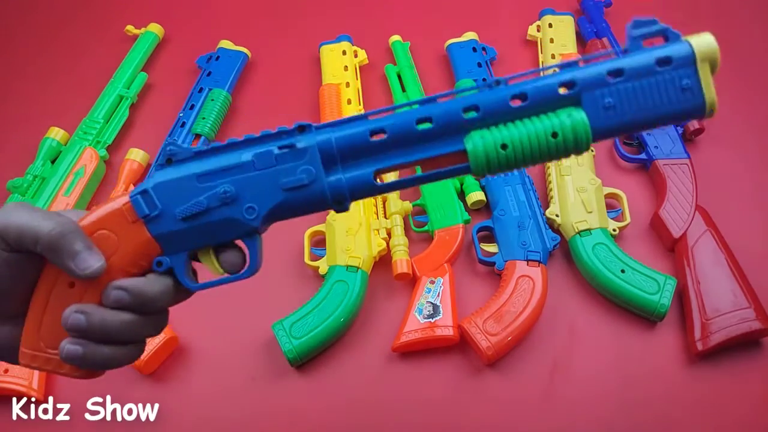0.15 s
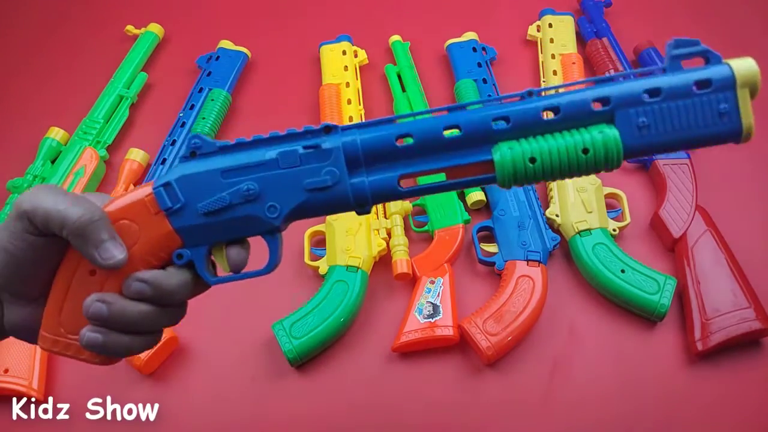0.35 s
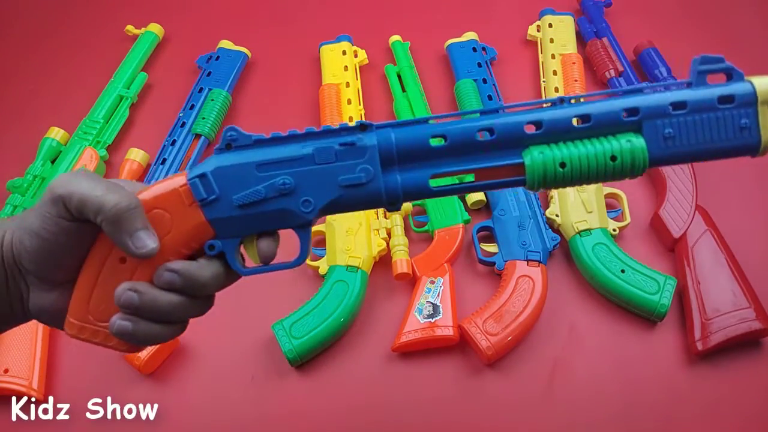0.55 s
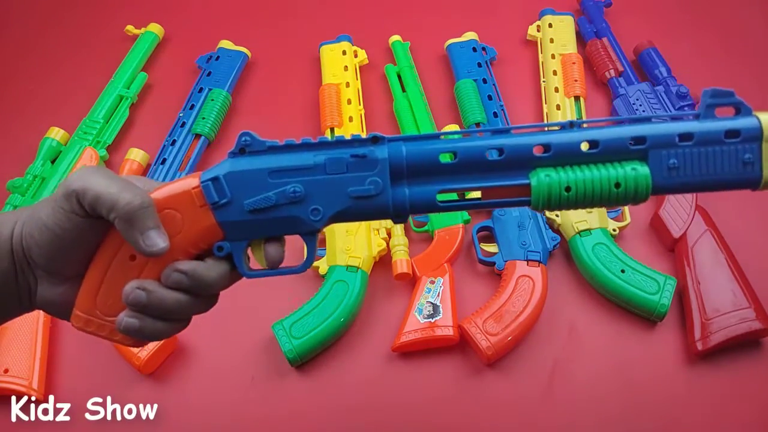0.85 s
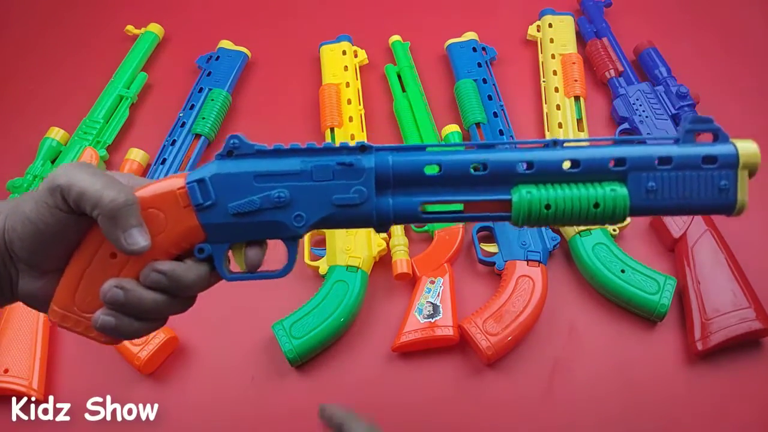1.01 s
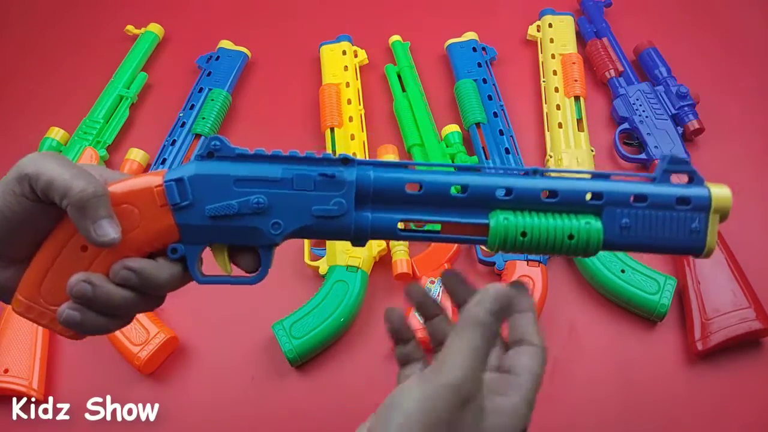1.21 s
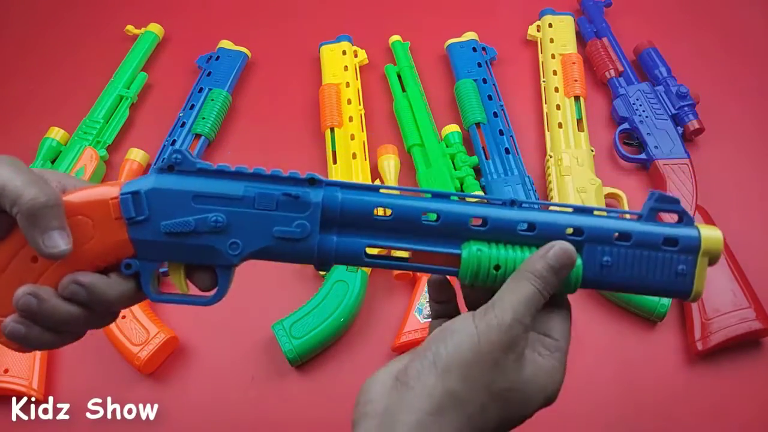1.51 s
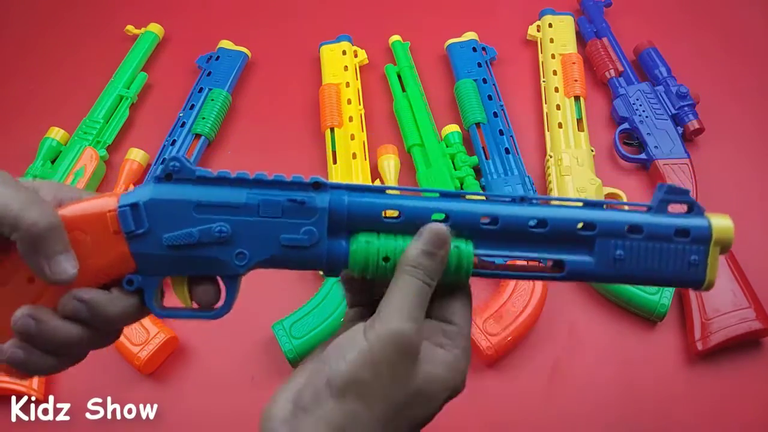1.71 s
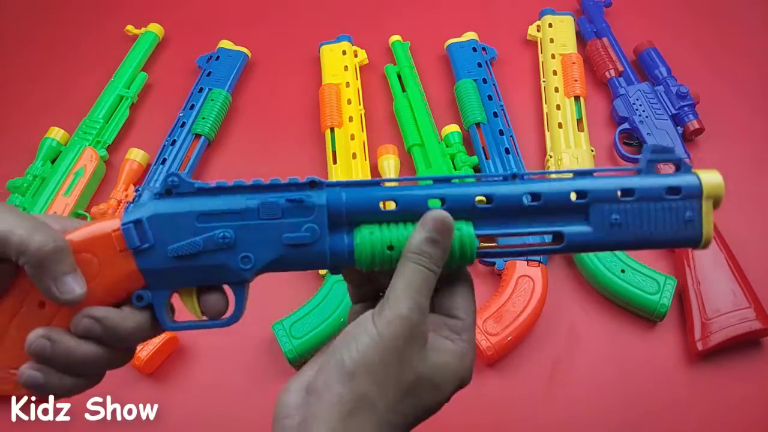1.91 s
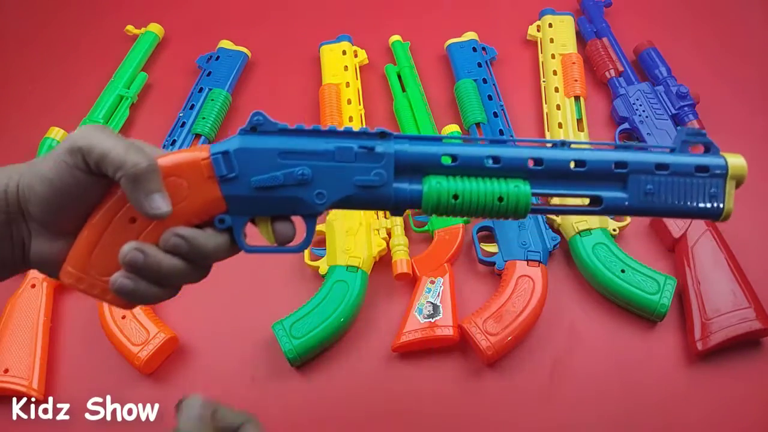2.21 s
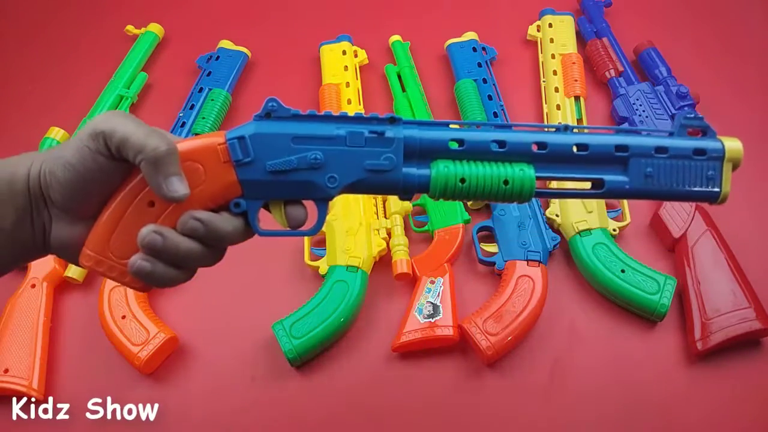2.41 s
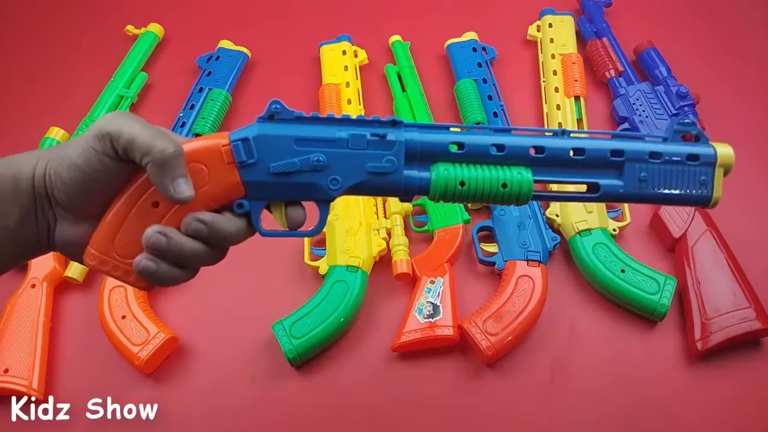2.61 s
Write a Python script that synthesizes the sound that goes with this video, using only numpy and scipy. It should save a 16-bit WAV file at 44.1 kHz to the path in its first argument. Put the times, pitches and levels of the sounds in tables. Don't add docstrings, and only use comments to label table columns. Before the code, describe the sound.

Light alternating plastic ticks from inside a toy gun, then a quick gritty slide with a sharp latch clack and stop knock, a short pause and a springy trigger snap; close stereo microphone, short room echo, quiet hum and hiss.

```python
import sys
import numpy as np
from scipy import signal
from scipy.fft import rfft, irfft
from scipy.io import wavfile
from scipy.ndimage import uniform_filter1d, map_coordinates

SR = 44100
rng = np.random.default_rng(int(sys.argv[2]) if len(sys.argv) > 2 else 0)


def elevation(decibels):
    levels = np.asarray(decibels, float)
    return 10 ** (levels / 20)


def log_audio(samples):
    frames = np.atleast_2d(samples).T
    limited = np.clip(frames, -1, 1)
    pcm = np.round(limited * 32767).astype(np.int16)
    wavfile.write(sys.argv[1], SR, pcm)


N = 121275


def shaped(points, rows):
    hz, db = np.array(points, float).T
    f = np.maximum(np.arange(N // 2 + 1) * SR / N, 1)
    gain = elevation(np.interp(np.log(f), np.log(hz), db, left=-90, right=-90))
    x = irfft(rfft(rng.standard_normal((rows, N))) * gain, N)
    return x / np.sqrt(np.mean(x ** 2))


def wide(pair, side_db):
    return pair[0] + elevation(side_db) * pair[1] * np.array([[1], [-1]])


def panned(db):
    return elevation(np.array([[db], [-db]]) / 2)


def walk(rate_hz):
    k = int(SR / rate_hz)
    steps = np.repeat(rng.standard_normal(N // k + 1), k)
    return 1.275 * uniform_filter1d(uniform_filter1d(steps, k), k)[:N]


def level_over_time(points):
    s, db = np.array(points).T
    return np.interp(np.arange(N) / SR, s, db, left=-120, right=-120)


def ring(x, hz, width):
    return signal.lfilter(*signal.iirpeak(hz, hz / width, fs=SR), x)


def treble(x, db):
    return x + (elevation(db) - 1) * signal.lfilter(*signal.butter(1, 8200, "high", fs=SR), x)


def fan():
    # f/Hz, level/dB rms, pitch wander/Hz
    motor_tones = [(201.7, -64, 4.23), (387.7, -72, 5.83), (301.8, -73.5, 8.9), (351, -91, 9.07)]
    # f/Hz, level/dB per Hz
    whirr_colour = [(24, -76), (40, -46.5), (167, -18), (196, -0.5), (274, -7.5), (384, -5.5), (568, -23),
                    (624, -21), (1000, -34), (1300, -79), (2200, -120)]
    turn_hz, throb_db, loudest_s = 4.377, 3, 2.25
    t = np.arange(N) / SR
    hum = 0
    for hz, db, wander in motor_tones:
        level = elevation(db + 3.28 * walk(6.96)) * np.sqrt(2)
        cycles = hz * t + np.cumsum(wander * walk(12)) / SR
        hum = hum + level * np.sin(2 * np.pi * cycles)
    throb = throb_db * np.cos(2 * np.pi * turn_hz * (t - loudest_s))
    whirr = wide(shaped(whirr_colour, 2), side_db=-12) * elevation(-62 + 0.97 * walk(4.0) + throb)
    return hum * panned(1) + whirr


def microphone_hiss():
    # f/Hz, level/dB per Hz
    hiss_colour = [(500, -4.5), (1000, -10), (2000, -12.5), (5000, -15.5), (10000, -13.5), (13300, -13),
                   (14800, -16), (15500, -35)]
    return wide(shaped(hiss_colour, 2), side_db=0) * elevation(-71.5 + 0.52 * walk(0.58))


def room(x):
    # f/Hz, time to fall 60 dB/s, level/dB
    room_bands = [(840, 0.38, 4.5), (1890, 0.44, 3), (5000, 0.25, 1), (11000, 0.31, 4.5)]
    # f/Hz, time to fall 60 dB/s, level/dB
    table_rings = [(709.2, 1.2, -18.5), (849, 1.05, -16.5), (885, 0.33, -20), (1190, .5, -22)]
    side_db, first_echo_s = 0.5, 0.00043
    table_hz, table_width_hz, table_t60_s, table_db = 795, 150, 0.69, -0.5
    t = np.arange(int(0.6 * SR)) / SR
    tail = 0
    for hz, t60, db in room_bands:
        band_filter = signal.butter(2, [hz / 1.95, hz * 2.0], "band", fs=SR)
        band = signal.lfilter(*band_filter, rng.standard_normal((2, len(t))))
        tail = tail + wide(band, side_db) * elevation(db - 60 * t / t60) * np.sqrt(14 / (t60 * SR))
    table = ring(rng.standard_normal((2, len(t))), table_hz, table_width_hz)
    table = table * elevation(table_db - 60 * t / table_t60_s)
    tail = tail + wide(table, side_db) * np.sqrt(14 / (table_t60_s * SR))
    for hz, t60, db in table_rings:
        tail = tail + elevation(db - 60 * t / t60) * np.sin(2 * np.pi * hz * t) * np.sqrt(14 / SR)
    tail = tail * np.clip(t / first_echo_s, 0, 1)
    return signal.fftconvolve(x[None], tail, axes=1)[:, :N]


def hand():
    # t/s, level/dB
    brush_level = [(1.24, -89), (1.36, -75), (1.55, -84), (1.72, -80), (1.8, -95)]
    # f/Hz, level/dB per Hz
    brush_colour = [(6000, -18), (10000, -5), (13500, 2), (15800, -4)]
    return wide(shaped(brush_colour, 2), side_db=0) * elevation(level_over_time(brush_level) + 1.5 * walk(25))


def slide():
    # t/s, level/dB
    rub_level = [(1.68, -77), (1.714, -55.5), (1.756, -41), (1.782, -28), (1.798, -41), (1.841, -40),
                 (1.97, -70.5), (1.975, -67)]
    # f/Hz, level/dB per Hz
    rub_colour = [(500, -18.5), (1130, 0), (1630, -7.5), (2600, 1.5), (4500, -6.5), (10000, -2),
                  (12200, -7.5), (15600, -13)]
    loudest_db = -44.5
    level = level_over_time([(s, min(db, loudest_db)) for s, db in rub_level])
    unevenness = 2.7 * walk(400) + 0.33 * walk(39.2)
    rub = wide(shaped(rub_colour, 2), side_db=0) * elevation(level + unevenness)
    shell = 0
    for hz, width in [(1100, 770), (2100, 450), (2900, 550), (4800, 1800), (9000, 2200)]:
        shell = shell + 0.95 * walk(45.13) * ring(rub, hz, width)
    return (rub + shell) * panned(-1)


def blows(rows, shell, sent, sent_db, gritty, crack_db, unlike, low_hz, top_hz, thump_db):
    out, t = np.zeros((3, N + 4096)), np.arange(4096) / SR
    hz, colour = np.array(sent, float).T
    f = np.linspace(0, SR / 2, 257)
    gain = elevation(np.interp(np.log(f + 1), np.log(hz), colour, left=-40, right=-40))
    spread = signal.firwin2(255, f, gain, fs=SR)
    band = signal.butter(4, [low_hz, top_hz], "band", fs=SR, output="sos")
    thump = elevation(thump_db) * np.sin(2 * np.pi * 55.5 * t) * np.exp(-t / 0.0063)
    for s, db, pan_db, contact, treble_db in rows:
        grit = rng.standard_normal((3, 4096))
        push = gritty * (grit[0] + unlike * grit[1:]) * np.exp(-t / contact) + (t == 0)
        chance = 1.5 * rng.standard_normal((len(shell), 2))
        body = elevation(crack_db) * push
        for k, (mode_hz, width, mode_db) in enumerate(shell):
            level = elevation(mode_db + chance[k][:, None]) * np.sqrt(1000 / width)
            body = body + (-1) ** k * level * ring(push, mode_hz, width)
        body = signal.sosfilt(band, treble(body, treble_db))
        body = body / np.abs(body.mean(axis=0)).max() + thump
        i = int(s * SR)
        out[:2, i:i + 4096] += body * elevation(db) * panned(pan_db)
        out[2, i:i + 255] += spread * elevation(db + sent_db)
    return out[:, :N]


def loose_part():
    # t/s, peak level/dB, left minus right/dB
    ticks = [(0.1906, -36.5, 0), (0.468, -39, 2.5), (0.726, -38.5, 3), (0.9833, -40, 0.5),
             (1.229, -38, -1.5)]
    tocks = [(0.3097, -37.5, 0.36), (0.5765, -35, 1), (0.832, -35, 0.63), (1.0634, -32, 1)]
    touches = [
        (1.251, -56.5, -5),
        (1.35, -48.5, 1),
        (1.554, -62, 0),
        (2.578, -63, -5),
    ]
    # f/Hz, width/Hz, level/dB
    tick_wall = [(880, 470, -1), (1185, 250, 2), (1530, 77, -4.5), (2070, 99, -3), (2410, 330, -13),
                 (3840, 300, -6.5), (7740, 950, -3.5), (9920, 470, -3)]
    tock_wall = [(1190, 170, -5.5), (1583, 89, 1.5), (3190, 220, -7.5), (4030, 310, -1), (5210, 190, -6),
                 (6480, 410, 0), (7200, 330, -0.5), (7890, 310, 2.5), (10600, 1300, -30)]
    touch_wall = [(1130, 160, -1.5), (2350, 260, -3), (3260, 720, -12)]
    # f/Hz, level/dB per Hz
    tick_sent = [(600, -2.5), (1100, -0.5), (2200, -5.5), (4000, -6.5), (8000, -13.5), (11000, -11)]
    tock_sent = [(600, -7), (1300, -4.5), (2300, -8.5), (4000, -0.5), (7500, -8.5), (11000, -21)]
    tick_rows = [(*r, 0.0013, 0) for r in ticks]
    tock_rows = [(*r, 0.0031, 0) for r in tocks]
    touch_rows = [(*r, 0.0089, -6) for r in touches]
    return (blows(tick_rows, tick_wall, tick_sent, sent_db=10.9, gritty=0.12, crack_db=-16,
                  unlike=0.73, low_hz=740, top_hz=15000, thump_db=-32)
            + blows(tock_rows, tock_wall, tock_sent, sent_db=9.0, gritty=0.067, crack_db=-5,
                    unlike=0.71, low_hz=570, top_hz=11200, thump_db=-41)
            + blows(touch_rows, touch_wall, tick_sent, sent_db=12.0, gritty=0.35, crack_db=-25,
                    unlike=0.64, low_hz=640, top_hz=5700, thump_db=-36))


def latch():
    # t/s, peak level/dB, left minus right/dB, contact length/s, treble/dB
    latch_blows = [
        (1.7695, -15.5, -4, 0.00082, 11),
        (1.7727, -15.5, 5, 0.0013, -1.5),
    ]
    catch_blows = [
        (1.7818, -13.5, -1.3, 0.0022, 0),
        (1.7875, -35, 1.7, 0.0014, 4),
    ]
    # f/Hz, width/Hz, level/dB
    latch_shell = [(1310, 300, 3.5), (2530, 300, 4.5), (3600, 510, -7), (4900, 260, -5.5), (6640, 780, -5),
                   (7860, 390, -5.5), (9800, 830, -0.5), (12000, 630, -5), (13100, 800, -16)]
    catch_shell = [(1230, 580, -16), (2230, 400, 3.5), (2670, 180, 1.5), (4630, 290, -7), (6230, 600, -11),
                   (7710, 410, 4), (9300, 590, 5.5), (10400, 600, -21), (12700, 1100, -11)]
    # f/Hz, level/dB per Hz
    latch_sent = [(550, -18), (850, 0.5), (1150, -12), (1600, -17), (2600, -0.5), (4300, -25), (9000, -10),
                  (14000, -22)]
    return (blows(latch_blows, latch_shell, latch_sent, sent_db=10.7, gritty=0.31, crack_db=-5.5,
                  unlike=0.34, low_hz=410, top_hz=12200, thump_db=-38.5)
            + blows(catch_blows, catch_shell, latch_sent, sent_db=8.4, gritty=0.25, crack_db=-6.5,
                    unlike=0.75, low_hz=1300, top_hz=14500, thump_db=-41))


def end_stop():
    # t/s, peak level/dB, left minus right/dB, contact length/s, treble/dB
    home_blows = [
        (1.9788, -29, 1, 0.0012, 1),
        (1.9813, -16, 0.75, 0.00098, -4),
        (1.9866, -22, 2, 0.0013, 8),
        (1.991, -32.5, 1, 0.0015, -6),
    ]
    # f/Hz, width/Hz, level/dB
    home_shell = [(702, 110, -3), (854, 230, -1), (1180, 360, -1.5), (1654, 110, -1.5), (1980, 200, -4.5),
                  (2353, 37, 0.5), (3720, 97, -8.5), (4430, 240, -3), (7040, 440, -36), (9850, 690, 2),
                  (13400, 900, -18)]
    # f/Hz, level/dB per Hz
    home_sent = [(450, -24), (750, 1), (1050, 3.5), (1600, -11), (2500, -2.5), (5000, -5.5), (7000, -13),
                 (15000, -11)]
    return blows(home_blows, home_shell, home_sent, sent_db=9.7, gritty=0.31, crack_db=-8,
                 unlike=0.6, low_hz=370, top_hz=12300, thump_db=-37.5)


def trigger():
    # t/s, peak level/dB, left minus right/dB, contact length/s, treble/dB
    snap_blows = [
        (2.7082, -14, -1.5, 0.00084, -7),
        (2.7097, -12.5, -3.5, 0.0024, 2.5),
        (2.7175, -25, -16, 0.003, 0),
    ]
    rebound_blows = [
        (2.722, -11, 5, 0.00082, 2),
        (2.7265, -18, -15, 0.0024, -2),
        (2.731, -22, -8, 0.0023, 0),
        (2.743, -36, -13, 0.0035, -15),
    ]
    # f/Hz, width/Hz, level/dB
    snap_shell = [(792, 98, 1), (1100, 150, 0.5), (1560, 170, -7.5), (2000, 330, -4), (2450, 130, 0.5),
                  (2735, 110, 1.5), (3790, 74, -6), (5400, 170, -1.5), (5900, 390, -11), (7600, 400, -2),
                  (8900, 500, -8.5), (10800, 1600, 2), (13500, 1200, -9)]
    rebound_shell = [(1040, 220, -13), (2400, 200, -1), (2620, 100, -2), (3800, 520, -3), (6070, 420, -0.5),
                     (9000, 400, -5), (9700, 500, 3.5), (11300, 590, -5), (12300, 1100, -2),
                     (14700, 1000, 4)]
    # f/Hz, level/dB per Hz
    trigger_sent = [(290, -51), (500, -16), (788, -6.5), (1630, -10.5), (2430, 1), (2960, -2.5), (5700, -8),
                    (8490, -3.5), (15000, -6)]
    return (blows(snap_blows, snap_shell, trigger_sent, sent_db=13.7, gritty=0.29, crack_db=-7,
                  unlike=0.73, low_hz=870, top_hz=13700, thump_db=-49.5)
            + blows(rebound_blows, rebound_shell, trigger_sent, sent_db=4.5, gritty=0.153, crack_db=-5,
                    unlike=0.46, low_hz=616, top_hz=13400, thump_db=-55))


def scene():
    hits = loose_part() + latch() + end_stop() + trigger()
    rub = slide()
    left, right = hits[:2] + rub
    left_lag_s = 0.00006
    left = map_coordinates(left, [np.arange(N) - left_lag_s * SR], mode="nearest")
    echo = room(hits[2] + elevation(-8.0) * rub.mean(axis=0))
    left, right = np.array([left, right]) + echo
    toy = np.array([treble(left, 6), treble(right, -6)])
    return toy + fan() + microphone_hiss() + hand()


def band_limit(x):
    return signal.sosfilt(signal.butter(12, 16540, fs=SR, output="sos"), x)


def record(dry):
    low_pass = signal.ellip(8, 0.3, 70, 16300, fs=SR, output="sos")
    return band_limit(signal.sosfilt(low_pass, dry))


dry = scene()
out = record(dry)
log_audio(out)
```